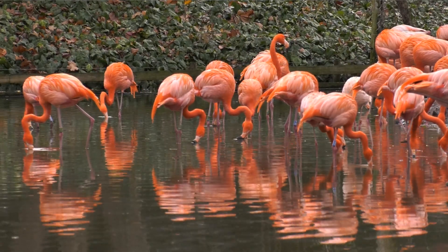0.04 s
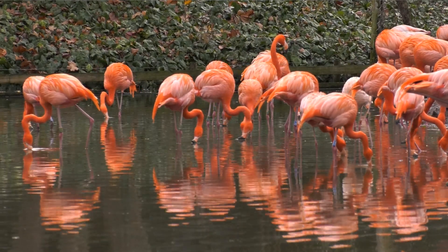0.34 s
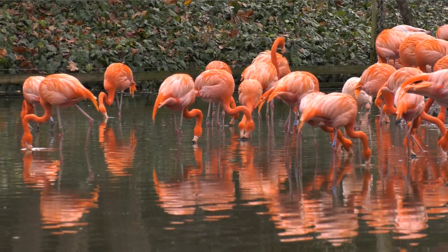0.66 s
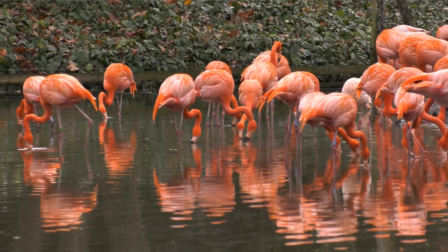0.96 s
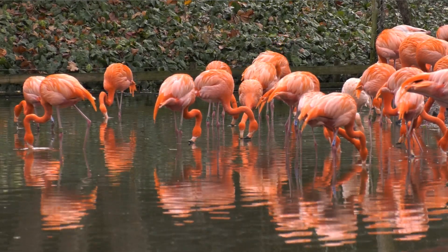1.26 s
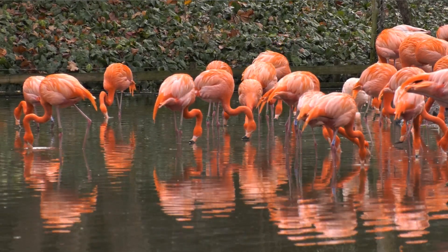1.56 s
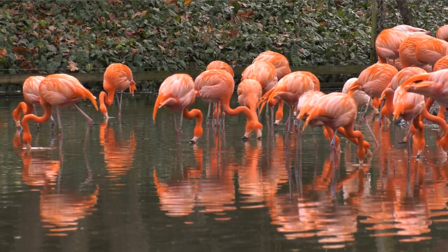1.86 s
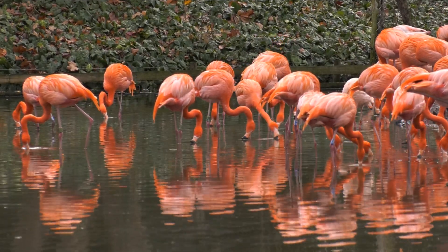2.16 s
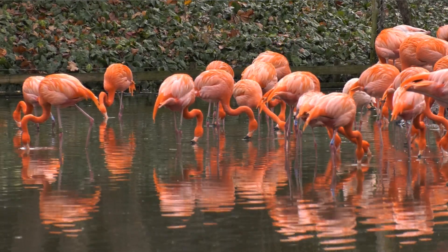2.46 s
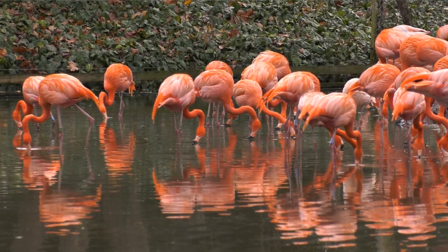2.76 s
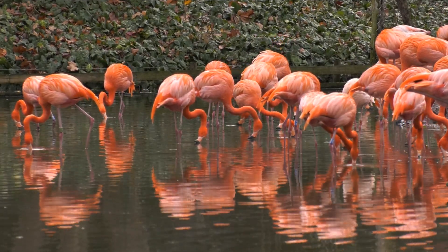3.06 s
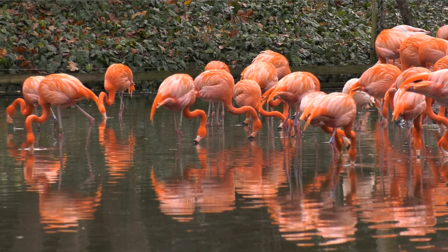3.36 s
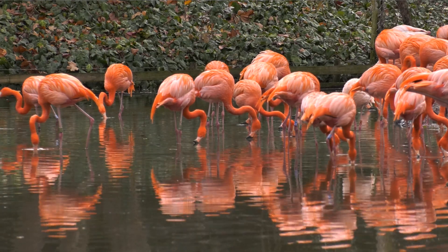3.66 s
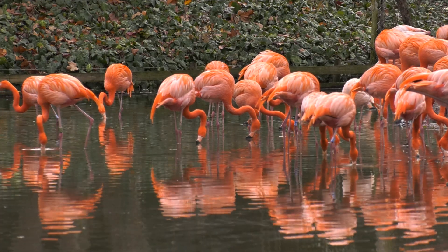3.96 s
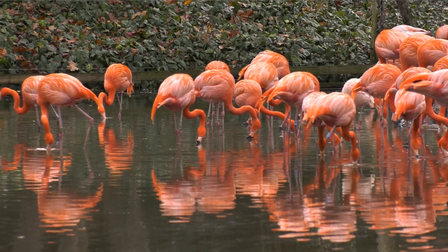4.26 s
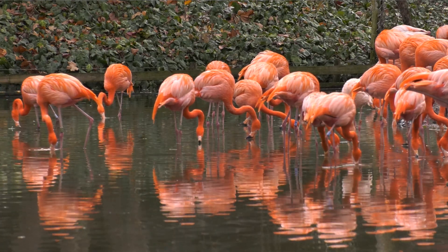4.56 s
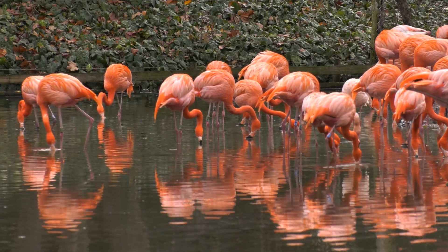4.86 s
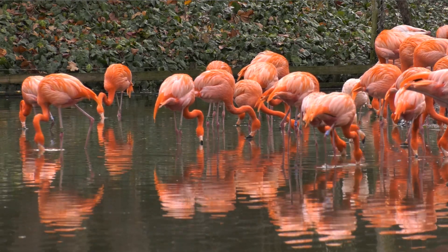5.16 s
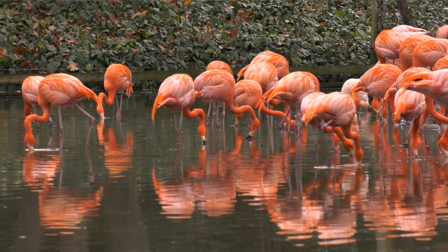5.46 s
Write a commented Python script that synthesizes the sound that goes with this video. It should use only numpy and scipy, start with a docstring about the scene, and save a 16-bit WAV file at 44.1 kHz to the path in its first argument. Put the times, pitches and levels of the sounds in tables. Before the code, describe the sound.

A steady, distant low rumble with a faint, thin hum runs through the whole five and a half seconds at an outdoor pond. From the very start a flamingo gives seven quick, rasping honks, heard across the water and slightly left of the microphone, with a light echo off the far bank. The first is the longest; the rest come about four a second, dropping in pitch and finally weakening, ending near 1.9 seconds. One soft, low thump follows at 2 seconds. Farther birds answer with faint, short, dull honks, at about 2.4 and 3.1 seconds, then three tiny pips around 3.5 seconds and another honk near 5.5. All along, bills dabble in the water with a very faint patter of drips. Slight sloshes come between 2.8 and 5.3 seconds, and one rounder drip plops at about 5.2 seconds.

```python
"""A flamingo gives seven quick, rasping honks, heard across a pond and a little left of the microphone.
Each honk is a train of pulses that ring the bird's chest and throat, and the far bank throws it back.
Other birds answer faintly from farther off. Bills dabble in the water, with drips and sloshes.
Behind it all lie a steady low rumble and a thin hum, with one soft thump."""
import sys
import numpy as np
from scipy import signal
from scipy.fft import rfft, irfft, next_fast_len
from scipy.io import wavfile
from scipy.ndimage import uniform_filter1d

SR = 44100
rng = np.random.default_rng(int(sys.argv[2]) if len(sys.argv) > 2 else 0)


def transcribe(signal):
    """Save signal, clipped to [-1, 1], as a 16-bit WAV file at the path in sys.argv[1]."""
    frames = np.atleast_2d(signal).T
    limited = np.clip(frames, -1, 1)
    pcm = np.round(limited * 32767).astype(np.int16)
    wavfile.write(sys.argv[1], SR, pcm)


N = 243431


def gain_of(db):
    """Decibels to gain."""
    return 10 ** (np.asarray(db) / 20)


def unit_rms(x):
    """Scales to rms 1."""
    return x / np.sqrt(np.mean(x ** 2) + 1e-20)


def curve_at(points, hz):
    """Reads (frequency, value) points on a log-frequency axis."""
    f, value = np.transpose(points)
    return np.interp(np.log(hz + 1), np.log(f + 1), value)


def add(mix, start, sound):
    """Mixes a sound in at start seconds."""
    part = mix[max(round(start * SR), 0):][:len(sound)]
    part += sound[:len(part)]


def wobble(size, hz):
    """Random drift of rms about 1, with motion up to about hz."""
    padded = next_fast_len(size + SR // 4, True)
    lowpass = np.exp(-(np.fft.rfftfreq(padded, 1 / SR) / hz) ** 2)
    return unit_rms(irfft(rfft(rng.standard_normal(padded)) * lowpass, padded))[:size]


def ease(u):
    """A smooth step from 0 to 1 as u goes from 0 to 1."""
    u = np.clip(u, 0, 1)
    return u * u * (3 - 2 * u)


def bump(t, centre, width):
    """A smooth hump of height 1."""
    return np.exp(-((t - centre) / width) ** 2)


# Spectrum of the distant rumble: f/Hz, relative level/dB
RUMBLE_SPECTRUM = [(12, -33), (20, -5), (43, -1.5), (74, -2.5), (142, 0.5), (204, -6), (377, -13),
                   (513, -9.5), (660, -9.5), (873, -5), (1370, -14.5), (1530, -16.5), (1660, -15.5),
                   (6180, -34), (16000, -41)]
# Likeness of the rumble on the microphone's two sides: f/Hz, correlation/0-1
RUMBLE_LIKENESS = [(30, 1), (1500, 1), (4000, 0.99), (8000, 0.95), (14000, 0.8)]
def rumble(level_db=-47, patchy_db=1.29):
    """Distant low noise with drifting louder patches, nearly alike left and right."""
    frames, hz = N // 512 + 6, np.fft.rfftfreq(2048, 1 / SR)
    left_re, left_im, apart_re, apart_im, patches = rng.standard_normal((frames, len(hz), 5)).T
    patches = unit_rms(uniform_filter1d(uniform_filter1d(patches, size=14, axis=0), size=8, axis=1))
    patches_db = patchy_db * patches / (1 + (hz[:, None] / 5000) ** 2)
    likeness = curve_at(RUMBLE_LIKENESS, hz)[:, None]
    left = left_re + 1j * left_im
    right = likeness * left + np.sqrt(1 - likeness ** 2) * (apart_re + 1j * apart_im)
    spectra = np.array([left, right]) * gain_of(curve_at(RUMBLE_SPECTRUM, hz)[:, None] + patches_db)
    noise = unit_rms(signal.istft(spectra, nperseg=2048, noverlap=1536)[1][:, :N])
    return gain_of(level_db) * signal.sosfilt(signal.butter(2, 30, "high", fs=SR, output="sos"), noise)


# Faint tones in the background: f/Hz, level/dB
HUM_TONES = [(49, -62), (1497, -63)]
def hum(waver_hz=3.34):
    """A low tone and a thin high one, each wavering in pitch."""
    out = np.zeros(N)
    for hz, db in HUM_TONES:
        turns = np.cumsum(hz + waver_hz * wobble(N, 16)) / SR
        out += gain_of(db) * np.sqrt(2) * np.sin(2 * np.pi * turns)
    return out


def thump(db=-30, hz=88, rise_s=0.0026):
    """One soft low bump that swells and dies at once."""
    t = np.arange(SR // 8) / SR
    return -gain_of(db) * t / rise_s * np.exp(1 - t / rise_s) * np.sin(2 * np.pi * hz * t)


# Diffuse tail from the bushes round the pond: f/Hz, t60/s, level/dB
BUSH_TAIL = [(300, 0.91, -9.5), (880, 0.96, -6), (1900, 0.51, -6), (4100, 0.31, 3), (4950, 0.61, -4.5),
             (5690, 0.75, 0), (7000, 0.52, -1.5), (8840, 0.094, -37)]
# Single echoes off the water on the way to the microphone: delay/s, level/dB
WATER_ECHOES = [(.0033, -18), (.0125, -23), (.021, -25)]
def pond(direct, bank_delay_s=0.073, bank_db=-14):
    """Adds the tail from the bushes, the echoes off the water and a dull one off the far bank."""
    taps = unit_rms(rng.standard_normal(SR) * (rng.random(SR) < 3000 / SR))  # about 3000 a second
    taps *= np.clip(np.arange(SR) / SR / .03, 0, 1)
    hz, t, spectra = signal.stft(taps, SR, nperseg=256)
    t60, db = (curve_at(np.array(BUSH_TAIL)[:, [0, k]], hz)[:, None] for k in (1, 2))
    unit_energy = np.sqrt(2 * np.log(1000) / (t60 * SR))
    spectra *= gain_of(db - 60 * t / t60) * unit_energy
    response = signal.istft(spectra, SR, nperseg=256)[1]
    for delay, echo_db in WATER_ECHOES:
        add(response, delay, gain_of([echo_db]))
    add(response, bank_delay_s, gain_of(bank_db) * signal.firwin(31, 3500, fs=SR))
    return direct + signal.fftconvolve(direct, response)[:N]


# Drips and bill clicks out on the pond: t/s, peak level/dB, starting f/Hz, t60/s
POND_DRIPS = [(1.404, -49.5, 8100, 0.0073), (1.95, -48, 1880, 0.049), (2.034, -53, 5000, .01),
              (3.068, -48, 6000, 0.0072), (3.453, -57, 10600, 0.018), (3.564, -51, 6700, 0.012),
              (4.735, -53, 4340, .02), (5.174, -35.5, 613, 0.034)]
def drip(db, hz, t60):
    """A tiny bubble rings and rises in pitch."""
    t = np.arange(0, t60, 1 / SR)
    return gain_of(db - 60 * t / t60) * np.sin(2 * np.pi * hz * t * (1 + 0.22 * t / t60))


def dabbling(per_s=110, least_db=-66, spread_db=6, lowest_hz=2600):
    """A fine patter of small drips from bills that sieve the water."""
    out = np.zeros(N)
    for when, pitch, chance in rng.random((int(per_s * N / SR), 3)):
        size_db = spread_db * min(-np.log(1 - chance), 3)
        add(out, when * N / SR, drip(least_db + size_db, lowest_hz * 3.2 ** pitch, t60=.005))
    return out


# Water stirred out on the pond: t/s, length/s, level/dB, centre f/Hz, width/octaves
POND_SLOSHES = [(2.833, 0.13, -61.5, 4140, 0.69), (3.205, 0.21, -69.5, 3303, 0.91),
                (4.339, 0.18, -66, 2230, 0.55), (4.776, 0.5, -62.5, 2230, 0.42)]
def slosh(length, db, hz, octaves):
    """A swell of clumped spray."""
    size = 2 * int(length * SR / 2)
    spray = rng.standard_normal(size) * gain_of(3.5 * wobble(size, 150))
    colour = np.exp(-.5 * (np.log2(np.fft.rfftfreq(size, 1 / SR) / hz + 1e-6) / octaves) ** 2)
    return gain_of(db) * unit_rms(irfft(rfft(spray) * colour) * signal.windows.hann(size))


# The far birds' tone colour at the microphone: f/Hz, relative level/dB
FAR_SPECTRUM = [(300, -17), (470, -2), (950, 3.5), (1400, -9), (1900, -12), (2500, -13.5), (3000, -26.5),
                (4000, -29.5), (6000, -45)]
# Answers from farther off: t/s, length/s, level/dB, top f/Hz, roughness/0-1, tilt/(dB per kHz)
FAR_ANSWERS = [(0, 0.056, -50, 416.4, 0.58, 7.5), (0.836, 0.084, -47, 370.2, .1, 5.5),
               (1.126, 0.081, -52.5, 470.6, 0.65, -9), (1.672, 0.11, -51, 448, 0.39, 5),
               (2.362, 0.1, -50, 455, 0.59, 0), (3.074, 0.12, -42.5, 466.6, 0.23, 0.5),
               (3.445, 0.027, -43.5, 998, 0.01, 2.5), (3.494, 0.031, -51.5, 972, 0.16, 4),
               (3.653, 0.033, -45.5, 1034, 0.4, 5), (4.861, .34, -63, 542, 0.26, 4),
               (5.452, 0.1, -49.5, 422.2, 0.74, -1)]
def far_call(length, db, top_hz, rough, tilt_db, arch=0.135):
    """A distant bird's short, dull honk or pip, its pitch sinking toward both ends."""
    u = np.linspace(-1, 1, int(length * SR))
    hz = top_hz * (1 - arch * (u + 0.11) ** 2) * (1 + 0.109 * rough * wobble(len(u), 205))
    turns = np.cumsum(hz) / SR
    tone = np.zeros(len(u))
    for k in range(1, int(4800 / top_hz) + 1):
        harmonic_db = curve_at(FAR_SPECTRUM, k * hz) + tilt_db * k * top_hz / 1000
        tone += gain_of(harmonic_db) * np.cos(2 * np.pi * (k * turns + rng.random()))
    flutter = 1 + 0.69 * rough * wobble(len(u), 320)
    return gain_of(db) * unit_rms(tone * flutter * signal.windows.tukey(len(u), .6))


def pulse_rate(t, length, first_hz, top_hz, crest, settle_s=0.065, end_hz=160):
    """The flamingo's pitch climbs to its top, settles a little, and moves to its closing pitch."""
    hz = first_hz + (top_hz - first_hz) * ease(t / crest)
    hz *= 1 - 0.07 * ease((t - crest) / settle_s)
    ending_s = np.clip(length - crest, 0.012, 0.062)
    ending = np.clip(1 - (length - t) / ending_s, 0, 1) ** 1.55
    return hz + (min(end_hz, top_hz) - hz) * ending


def register(t, hz, top_hz, crest, accent, rough_hz=169.7, smooth_hz=193.5, sing_hz=186, mend_hz=166):
    """Roughness, pulse doubling and overtone share, each 0-1, as they follow from the pitch."""
    # slow pulses are rough; fast or hard-driven ones run smoothly
    rough = (0.56 - 0.41 * ease((hz - rough_hz) / (smooth_hz - rough_hz))) * (1 - 0.39 * accent)
    # a high honk sings on the way up, then breaks into slightly hoarse double pulses
    broken = ease((t - crest - 0.003) / 0.02) * ease((top_hz - sing_hz) / 10)
    doubling = 0.97 * broken * ease((hz - mend_hz) / 12)
    clear = 0.66 * (1 - broken) * ease((hz - sing_hz) / 10)
    return np.clip([rough + 0.07 * doubling, doubling, clear], 0, 1)


def syrinx(turns, rough, doubling):
    """Sharp pulses, uneven in size when rough, each followed by a puff of air."""
    # a second pulse halfway through the cycle cancels the odd harmonics
    pulses = sum((1 - doubling * (k % 2)) * np.cos(2 * np.pi * k * turns) for k in range(1, 44))
    puffs = (.3 + np.exp(-(turns % 1) / .4)) * rng.standard_normal(len(turns))
    shimmer_db = (7 * rough - 0.2) * wobble(len(turns), 170)
    return (unit_rms(pulses) + 2 * rough * unit_rms(puffs)) * gain_of(shimmer_db)


def overtone(turns):
    """A second membrane sings at nine times the pulse rate; throbbing twice a cycle adds side tones."""
    return unit_rms(np.sin(2 * np.pi * 9 * turns) * (1 + .45 * np.cos(4 * np.pi * turns)))


def resonate(x, hz, width):
    """A steep, gliding resonance: shifts hz down to zero, smooths twice, and shifts back."""
    carrier = np.exp(2j * np.pi * np.cumsum(hz * np.ones(len(x))) / SR)
    pole = np.exp(-np.pi * width / SR)
    smoothed = signal.lfilter([(1 - pole) ** 2], [1, -2 * pole, pole * pole], x / carrier + 1e-18)
    return 2 * (carrier * smoothed).real


def cavity(drive, modes, tuning, band_hz, ring=0):
    """Resonances scaled by tuning, kept to their band and to a steady power; the first can ring on."""
    rung = sum(gain_of(db) * resonate(drive, hz * tuning, width) for hz, width, db in modes)
    first_hz, first_width, _ = modes[0]
    rung += ring * resonate(drive, first_hz * tuning, first_width / 2.6)
    bandpass = signal.butter(2, band_hz, "band", fs=SR, output="sos").repeat(2, axis=0)
    rung = signal.sosfilt(bandpass, rung)
    power = uniform_filter1d(uniform_filter1d(rung ** 2, size=600), size=600)
    return rung / np.sqrt(abs(power) + 1e-12)


# Chest resonances: f/Hz before tuning, width/Hz, relative level/dB
CHEST_MODES = [(446, 170, 0), (896, 620, 1.5), (1342, 217, 0.5)]
def chest(drive, strain_db, doubling):
    """The low body of the honk, fuller with effort and in double pulses."""
    db = -44.5 + 0.26 * strain_db + 2.5 * doubling
    return gain_of(db) * cavity(drive, CHEST_MODES, tuning=0.972, band_hz=(230, 1700))


# High resonances, bill half open: f/Hz, width/Hz, relative level/dB
RASP_MODES = [(5100, 1750, 6), (6060, 820, -0.5), (8200, 790, -40)]
def rasp(t, drive, strain_db, bill, shut, attack_s=0.021, fade_db_per_s=18.5):
    """A high rasp that comes in late and fades; a nearly shut bill narrows it to a squeak."""
    db = -51 + 0.35 * strain_db + 3.5 * shut - fade_db_per_s * t
    rung = cavity(drive, RASP_MODES, bill, band_hz=(3670, 8040), ring=6 * shut)
    return gain_of(db) * ease(t / attack_s) * rung


# Throat resonances, bill half open: f/Hz, width/Hz, relative level/dB
THROAT_MODES = [(1898, 420, 5), (2100, 1490, -1), (3240, 71, -21), (3650, 510, -18)]
def throat(drive, top_hz, bill, shut, closing):
    """Brighter in faster honks; rings longer with the bill nearly shut and on the closing accent."""
    return cavity(drive, THROAT_MODES, bill, band_hz=(1200, 21.26 * top_hz), ring=2.2 * shut + closing)


# The flamingo across the pond: t/s, length/s, base level/dB, push after/s, push width/s, push/dB,
# closing accent/dB, first pulse f/Hz, top pulse f/Hz, top after/s, throat f/Hz with the bill shut,
# its rise/Hz as the bill opens
FLAMINGO_HONKS = [(0.018, 0.33, -39, 0.07, 0.052, 10, 7.5, 159.7, 224.2, 0.08, 1856, 174),
                  (0.441, 0.15, -38.5, 0.058, 0.032, 13.5, 9, 171.9, 213.6, 0.085, 1816, 153),
                  (0.693, 0.15, -36.5, 0.059, 0.025, 12.5, 4.5, 170.2, 204, 0.064, 1790, 130),
                  (0.941, 0.16, -36.5, 0.0695, 0.032, 11, 3, 157.2, 198.8, 0.068, 1770, 130),
                  (1.2, 0.097, -36, 0.0516, 0.03, 3, 6.5, 153.6, 185.4, 0.076, 1715, 267),
                  (1.477, 0.113, -41, 0.045, 0.02, 10.5, 7, 146.7, 165.2, 0.094, 1695, 278),
                  (1.752, 0.1025, -44.5, 0.063, 0.036, 11, -6, 138, 147, 0.095, 1707, 110)]
def honk(length, level_db, push_at, push_width, push_db, closing_db, first_hz, top_hz, crest,
         shut_hz, open_hz, attack_s=0.0032, release_s=0.012, hop_hz=1950):
    """Two pushes of air drive pulses that ring chest, throat and rasp; high up, an overtone takes over."""
    t = np.arange(0, length, 1 / SR)
    push, closing = bump(t, push_at, push_width), bump(t, length - 0.0189, 0.0121)
    effort_db = level_db + push_db * push + closing_db * closing
    strain_db = effort_db + 33  # relative to a middling effort
    hz = pulse_rate(t, length, first_hz, top_hz, crest)
    rough, doubling, clear = register(t, hz, top_hz, crest, accent=np.maximum(push, closing))
    doubling *= 1 - 0.62 * closing  # the closing accent partly returns to single pulses
    # the bill opens toward the top of the pitch, raising the throat resonance, and shuts faster
    gape = bump(t, crest, np.where(t < crest, 0.038, 0.023))
    throat_hz = shut_hz + open_hz * gape + 48.6 * closing
    bill = throat_hz / 1850  # tuning, 1 when half open
    shut = np.clip((1930 - throat_hz) / 130, 0, 1) * (1 - doubling) * (1 - clear) ** 2
    jitter = 1 + .2 * rough ** 2 * wobble(len(t), 160)
    turns = np.cumsum(hz * jitter) / SR
    drive = syrinx(turns, rough, doubling)
    breath = (0.5 + 2 * np.exp(-(turns % 1) / .5)) * rng.standard_normal(len(t))  # a rush each pulse
    # in double pulses the overtone hops to the even harmonic nearest hop_hz
    hop = np.clip(0.34 * doubling * (1 - closing) ** 2, 0, 1 - clear)
    even_harmonic = 2 * round(hop_hz / top_hz / 2)
    hopped = unit_rms(np.sin(2 * np.pi * even_harmonic * turns))
    sung = np.sqrt(clear) * overtone(turns) + np.sqrt(hop) * hopped
    rung = np.sqrt(1 - clear - hop) * throat(drive + .22 * breath, top_hz, bill, shut, closing)
    voice = gain_of(effort_db) * (rung + sung) + chest(drive, strain_db, doubling)
    voice += rasp(t, drive + breath, strain_db, bill, shut)
    return voice * np.clip(np.minimum(t / attack_s, (length - t) / release_s), 0, 1)


def scene(thump_at_s=2.024, left_db=0.55, right_db=-0.6):
    """Birds and water echo across the pond over the background; all leans a little to the left."""
    direct = dabbling()
    for source, rows in ((honk, FLAMINGO_HONKS), (far_call, FAR_ANSWERS),
                         (drip, POND_DRIPS), (slosh, POND_SLOSHES)):
        for start, *settings in rows:
            add(direct, start, source(*settings))
    at_microphone = pond(direct)
    add(at_microphone, thump_at_s, thump())
    return (at_microphone + rumble() + hum()) * gain_of([[left_db], [right_db]])


def record(dry):
    """The microphone's two channels, cut off steeply at the top of the treble."""
    lowpass = signal.firwin(511, cutoff=16450, window=("kaiser", 9), fs=SR)
    return signal.oaconvolve(dry, lowpass[None], "same")


dry = scene()
out = record(dry)
transcribe(out)
```